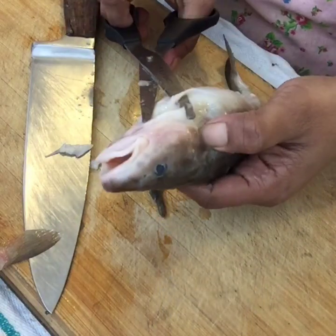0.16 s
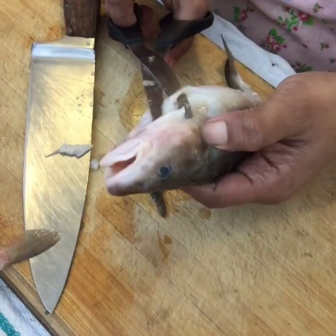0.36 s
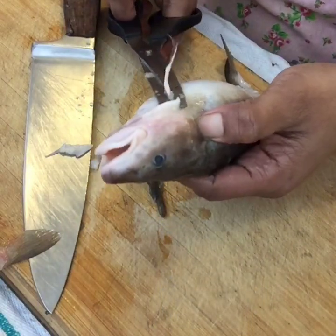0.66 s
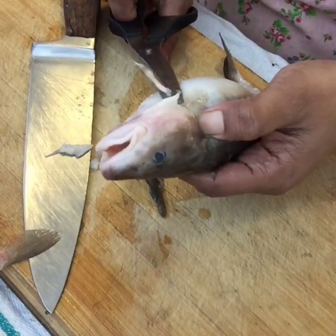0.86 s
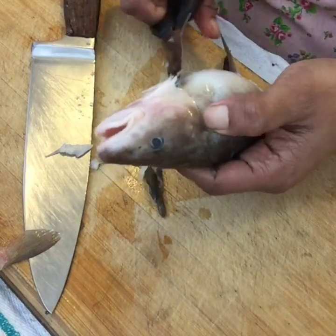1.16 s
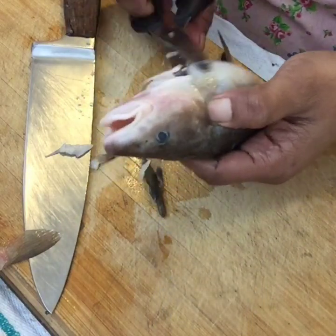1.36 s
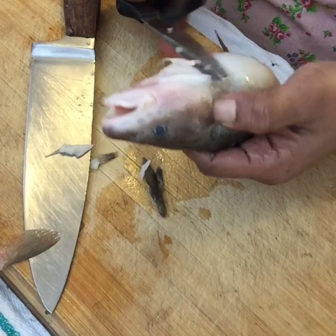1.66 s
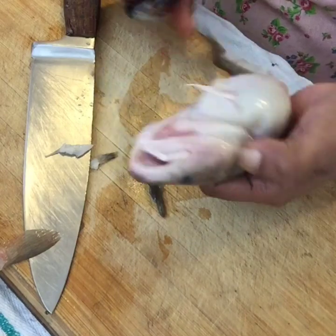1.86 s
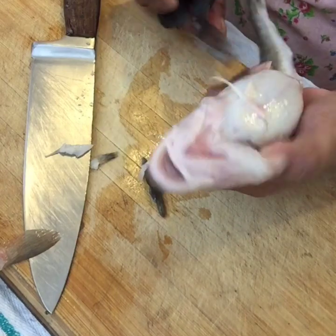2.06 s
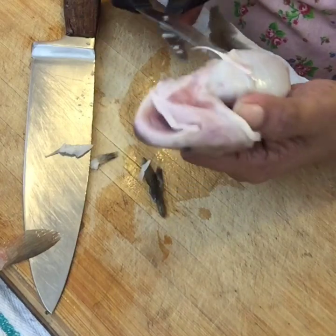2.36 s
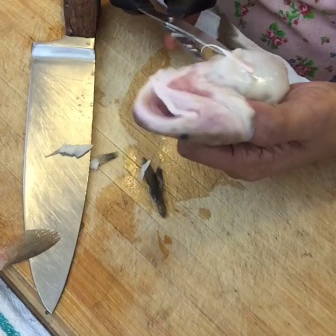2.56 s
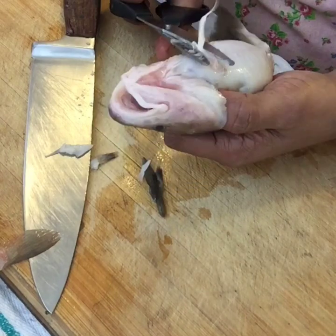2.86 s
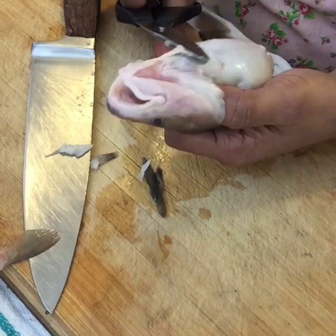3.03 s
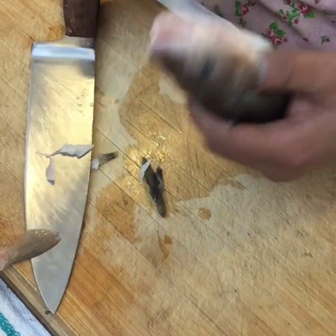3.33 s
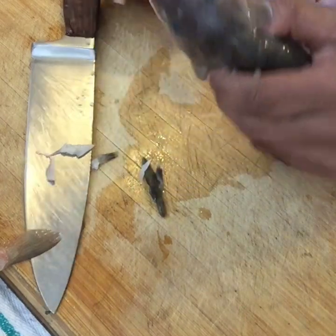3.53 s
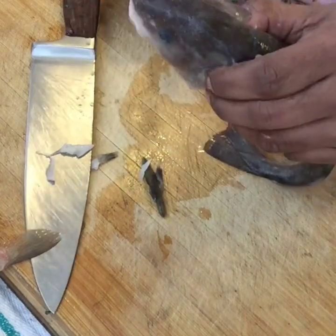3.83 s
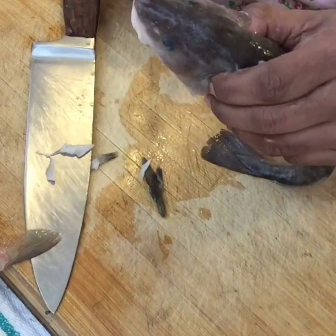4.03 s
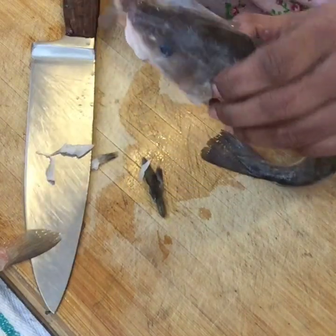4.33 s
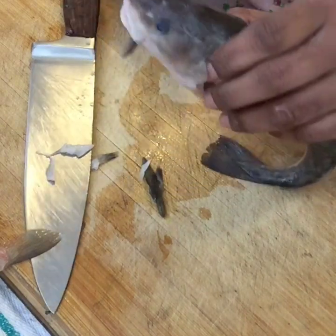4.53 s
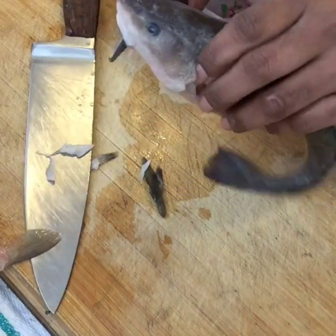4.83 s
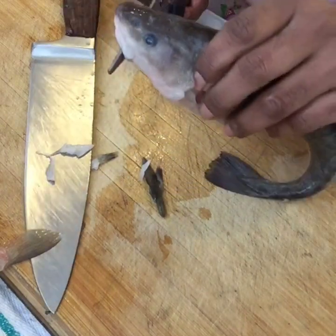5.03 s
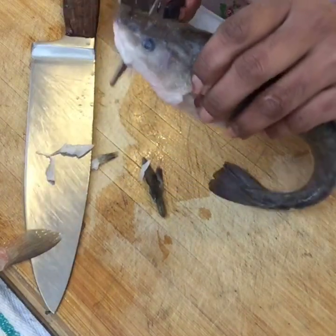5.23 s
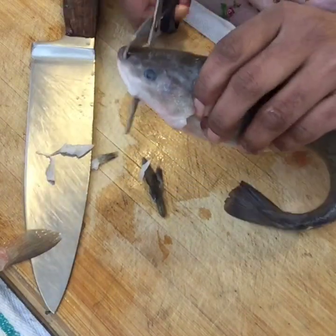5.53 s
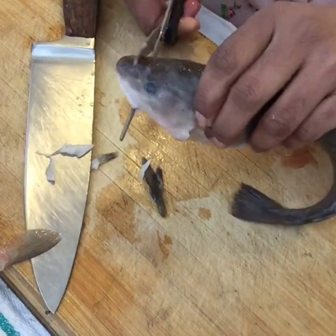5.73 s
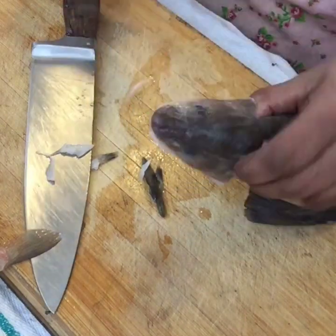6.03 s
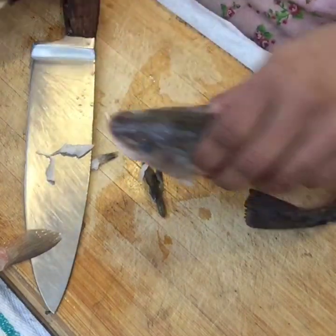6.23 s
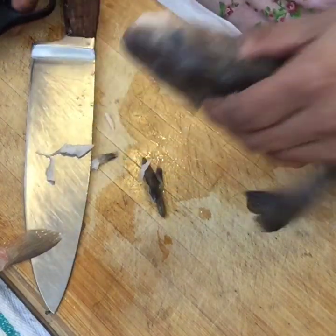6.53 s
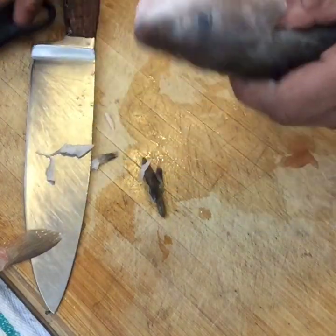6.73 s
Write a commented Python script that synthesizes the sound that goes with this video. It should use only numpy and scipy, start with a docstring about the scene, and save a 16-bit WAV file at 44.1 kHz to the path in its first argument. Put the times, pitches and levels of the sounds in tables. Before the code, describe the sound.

Small metallic scissor snips over faint room hum, then a solid knock on wood, a long near-silence, and two sharp closing clacks with bounces.

```python
"""In a small kitchen, scissors snip fins off a raw fish over a wooden board, and tools knock on the board.
Snips and knocks excite decaying sinusoidal modes of blades and board, with a noise crack at contact.
Short swells of filtered noise are soft rustles of wet fingers and blades, and one bright snip burst;
dense noise echoes are the room. Wavering sine tones are appliance hum, shaped noise is rumble and hiss,
and an earlier clink dies away."""
import sys
import numpy as np
from scipy import signal
from scipy.fft import rfft, irfft
from scipy.io import wavfile
from scipy.ndimage import uniform_filter1d

SR = 44100
rng = np.random.default_rng(int(sys.argv[2]) if len(sys.argv) > 2 else 0)


def digitize_waveform(pressure):
    """Quantize a signal to 16-bit integers and store it at the path in sys.argv[1].

    Rows of a 2-D input are taken as channels; values are limited to [-1, 1].
    """
    field = np.atleast_2d(pressure).T
    bounded = np.clip(field, -1, 1)
    quanta = np.round(bounded * 32767).astype(np.int16)
    wavfile.write(sys.argv[1], SR, quanta)


N = 303981

# appliance tones: f/Hz, rms wander/Hz, rms swell/dB, mean level curve [(t/s, level/dB)]
HUM_TONES = [(61.3, 0.37, 3, [(0, -76), (1.6, -63.5), (3, -60), (4.3, -61.5), (5.2, -70), (6.89, -72)]),
             (120.6, 0.71, 2.7, [(0, -72), (3.75, -71.5), (3.95, -61.5), (6.89, -61.5)]),
             (152, 1.5, 3, [(0, -64), (3, -69.5), (6.89, -62.5)]), (239.8, 2.5, 4, [(0, -85), (.27, -61),
             (1.15, -61.5), (1.5, -78.5), (2.1, -72), (2.5, -61.5), (2.95, -61), (3.6, -67.5), (4.45, -78),
             (4.7, -62), (5.1, -77), (5.7, -61.5), (6.89, -60.5)])]
# room rumble and microphone noise: f/Hz, relative spectral level/dB
HISS_SPECTRUM = [(15, -79), (25, -40.5), (36, -14), (49, -6), (68, -4.5), (87, -9.5), (131, -7.5),
                 (190, -16), (232, -6), (339, -22.5), (979, -27), (4000, -36.5), (6000, -38), (9000, -43.5),
                 (12000, -44.5), (15300, -48), (15900, -59), (16600, -72.5)]
# an earlier clink still dying away: low f/Hz, high f/Hz, starting level/dB
FADING_BANDS = [(1300, 1500, -74), (2100, 2370, -73.5), (4000, 4400, -76.5), (5270, 6100, -77.5)]
# blades biting fin rays, ticking and closing: t/s, level/dB, colour f/Hz, colour width/octaves,
# crack level over the ring/dB
SNIPS = [(.466, -61, 2250, .12, -30), (.4888, -54, 2220, 0.091, -30), (.6785, -59, 1960, 1.6, -1),
         (.7155, -59, 4200, .67, -1), (.7385, -51, 2230, 0.7, -1), (.7476, -54, 2240, 1.7, -7),
         (.7748, -51, 2250, 2.1, -8), (.8312, -65, 5000, .96, 1), (.8642, -62, 5400, 0.16, -2),
         (.9028, -44, 5800, 1.1, -8), (.9060, -25, 4300, 1.15, -16), (.9088, -27.5, 2460, 1.6, -5.5),
         (1.1670, -47.5, 2190, 0.13, -30), (1.1674, -55.5, 4200, 0.35, -30), (1.2500, -50, 2230, 0.13, -7),
         (1.7845, -42, 2920, 0.16, -32), (2.5718, -41, 2520, 0.4, -30), (3.0280, -49, 1652, .13, -5.5),
         (3.0315, -49, 6450, .28, 0.4), (3.0470, -42.5, 1598, 0.14, 2), (3.0502, -31, 1600, .12, -5.5),
         (3.0560, -36, 3402, .5, -7.4), (3.0810, -40.5, 2910, 0.29, -10.5), (3.0904, -50, 2590, .56, -7.5),
         (4.0892, -59, 3160, 0.34, -16.5), (5.5094, -59, 1900, 0.29, -27), (5.7035, -49, 2250, 0.6, -25)]
# blade modes: nominal f/Hz, relative level/dB, t60 before the ring length factor/s
BLADE_MODES = [(1640, -16.5, 0.027), (2031, -4, 0.038), (2210, 1, .04), (2450, -2.5, 0.018),
               (2680, -3, 0.031), (3161, -7.5, 0.017), (3323, -2.5, 0.019), (3856, -1.5, 0.068),
               (4370, -0.5, .025), (5407, 0, 0.042), (6250, -10.5, 0.046), (6457, 4.5, 0.029),
               (7090, -6, .02), (7756, 1, 0.01)]
# kitchen echo bands: centre f/Hz, relative level/dB, t60/s
ECHO_BANDS = [(153, -3, 0.4), (286, -7, .42), (601, -10, 0.32), (1200, -12, .4), (2400, -14, 0.34),
              (4827, -15, 0.32), (9610, -18, 0.22), (13880, -15.5, 0.13)]
# tools landing and bouncing: t/s, level/dB, colour f/Hz, colour width/octaves, ring length factor,
# crack level over the ring/dB, lingering mode level over the ring/dB
KNOCKS = [(0.907, -47.5, 553, 1.4, 0.69, -42, -45), (3.327, -29, 750, 1, 1.3, -30, -40),
          (3.3433, -10.5, 1260, 1.5, 0.68, -35, -28), (3.3462, -12.5, 950, 1.92, 0.61, -40, -29),
          (3.352, -15, 2844, 0.32, 0.86, -40, -37), (3.355, -21, 635, 4, 1.2, -35, -28.5),
          (3.368, -31, 410, 1.4, 1.3, -42, -20), (3.399, -41, 640, .26, 1.7, -38, -30),
          (5.70, -50.5, 294, 1.14, 1, -29, -36), (6.4521, -2.5, 4300, 0.79, 0.32, -14, -30),
          (6.4542, -8.5, 1510, 2.22, 0.78, -22, -25), (6.512, -23, 2557, 1.7, 0.53, -30, -23),
          (6.531, -23.5, 1770, 1.13, 0.64, -23, -30), (6.731, -37.5, 1500, 1.84, 0.51, -33, -43),
          (6.738, -30.5, 477, 1.23, 0.94, -33, -34.5), (6.854, -23.5, 670, 1.9, 0.75, -37.5, -28),
          (6.859, -8, 2220, 0.84, 0.36, -57, -15), (6.862, -23, 300, 3.7, 1.6, -45, -30),
          (6.8838, -19.5, 2120, 3, 0.37, -34, -3)]
# board modes: nominal f/Hz, relative level/dB, t60 before the ring length factor/s
BOARD_MODES = [(143, -8, 0.42), (220.3, -2.5, 0.21), (344, -4, 0.11), (410, -6.5, .12), (575, -1, 0.14),
               (642, -3, 0.1), (790, -12, 0.078), (891, -13.5, 0.024), (1040, -10.5, 0.12),
               (1134.3, -2, 0.04), (1260, -8.5, .07), (1310, -10.5, 0.035), (1670, 0, 0.044),
               (2126, -1.5, 0.029), (2178, -8.5, 0.11), (2290, -5, 0.019), (2426, -15.5, 0.044),
               (2567, -10.5, 0.031), (3257, -8.5, 0.073), (3400, -10, 0.019), (3770, -8.5, 0.064),
               (4110, -3, 0.014), (4810, -6.5, .04), (5380, -11, 0.066), (5875, -11.5, .03),
               (6730, -20.5, .04), (8390, -22.5, .03), (9500, -22.5, .03)]
# soft rustles of wet fingers and blades, and one short bright snip burst at 3.055 s:
# middle t/s, half-length to 1/e/s, level/dB, low f/Hz, high f/Hz
RUSTLES = [(1.42, 0.016, -70.5, 1500, 6500), (1.776, 0.022, -69, 5500, 6860),
           (1.788, 0.016, -66, 8900, 10700), (1.782, 0.03, -65.5, 2260, 3500),
           (2.204, 0.028, -75, 1500, 7000), (3.055, .007, -37, 5340, 15500),
           (4.66, 0.012, -74.5, 2510, 4000), (4.933, .02, -75.5, 5960, 16000),
           (5.208, .018, -76, 10840, 15240), (5.511, 0.041, -78.5, 8970, 16090)]
# dips of the microphone port: f/Hz, width/Hz, level/dB
PORT_DIPS = [(4950, 500, -4), (10400, 800, -5)]

HUM_SWELLS_PER_S = 11
TREBLE_HISS_DB = -68.5
FADING_T60_S = 2.1
SNIP_CRACK_HZ, KNOCK_CRACK_HZ = (9500, 15500), (2980, 10500)
SNIP_CONTACT_MS, KNOCK_CONTACT_MS = 1.6, 1.8
# what the walls receive
RING_TO_ROOM_DB, CRACK_TO_ROOM_DB, SCATTER_S = -10.5, 2, 0.00083
SNIP_ECHO_DB = -1.5
# a snip that touches few modes rings longer: length factor at one octave, power of the width
SNIP_RING, SNIP_RING_POWER = 0.45, -.3
# the mode that lingers after a blow: (f/Hz, ring length factor)
BLADE_LINGER, BOARD_LINGER = (2450, 4.5), (2170, 3.2)
LINGER_OCTAVES, LINGER_DELAY_S = .09, 0.0016
LINGER_FLUTTER_DB, LINGER_FLUTTER_MS = 4.5, 6
# harder snips wake it more: dB over the ring for the hardest, dB lost per dB of softer snip
BLADE_LINGER_DB, BLADE_LINGER_SLOPE = -17, .6
TOP_HZ = 16672


def undb(db):
    """Logarithmic level: decibels become an amplitude gain."""
    return 10 ** (np.asarray(db) / 20)


def unit(x):
    """Normalization of power: the signal is scaled to rms 1."""
    return x / np.sqrt(np.mean(x ** 2))


def band(x, low_hz, high_hz):
    """Band limitation by a Butterworth filter."""
    sos = signal.butter(N=2, Wn=[low_hz, high_hz], btype="band", fs=SR, output="sos")
    return signal.sosfilt(sos, x)


def walk(rate):
    """Random modulation: twice-averaged noise of rms 1 that turns about rate times a second."""
    k = int(SR / rate)
    return unit(uniform_filter1d(uniform_filter1d(rng.standard_normal(N), k), k))


def decay(t, t60):
    """Exponential damping: the amplitude falls 60 dB in t60."""
    return np.exp(-np.log(1000) * t / t60)


def hum():
    """Frequency and amplitude modulation: low appliance tones swell, fade and wander a few hertz."""
    out = 0
    for hz, wander_hz, swell_db, curve in HUM_TONES:
        phase = 2 * np.pi * np.cumsum(hz + wander_hz * walk(16)) / SR
        db = np.interp(np.arange(N) / SR, *np.transpose(curve))
        db = db + swell_db * walk(HUM_SWELLS_PER_S) + 4.4 * walk(25)
        out = out + np.sqrt(2) * undb(db) * np.sin(phase)
    return out


def hiss():
    """Spectral shaping of random noise: steady treble over a bass that swells a little."""
    hz, db = np.transpose(HISS_SPECTRUM)
    f = np.maximum(np.fft.rfftfreq(N, 1 / SR), 1)
    spectrum = rfft(rng.standard_normal(N)) * undb(np.interp(np.log(f), np.log(hz), db))
    treble = irfft(spectrum * (f >= 400), N)
    bass = irfft(spectrum * (f < 400), N)
    swell = undb(0.5 + 0.59 * walk(4.1))
    return undb(TREBLE_HISS_DB) / np.std(treble) * (treble + bass * swell)


def fading_clink():
    """Exponential decay: narrow noise bands left by an earlier clink sink into the hiss."""
    bands = 0
    for low_hz, high_hz, db in FADING_BANDS:
        bands = bands + undb(db) * unit(band(rng.standard_normal(N), low_hz, high_hz))
    return bands * decay(np.arange(N) / SR, FADING_T60_S)


def blows(events, modes, crack_hz, contact_ms, linger):
    """Modal excitation: each blow weights the body's modes by where it lands, and cracks during contact.
    Row 0 reaches the microphone, row 1 the walls."""
    out, t = np.zeros((2, N + SR)), np.arange(SR // 5) / SR
    hz, mode_db, t60 = np.array(modes, float).T[:, :, None]
    linger_hz, linger_length = linger
    contact = contact_ms / 1000
    rise = np.sin(np.pi / 2 * np.minimum(t / (0.35 * contact), 1)) ** 2
    free = np.maximum(t - 0.71 * contact, 0)  # time since damping began
    # the ring is a near sound; the walls get mostly the first instant
    far = undb(RING_TO_ROOM_DB) + np.exp(-free / SCATTER_S)
    paths = np.array([np.ones(len(t)), far])
    # from afar the crack is one clean click, its energy set by the contact time
    click = band(signal.unit_impulse(len(t), int(contact * SR)), *crack_hz)
    click = undb(CRACK_TO_ROOM_DB) * click * np.sqrt(contact * SR / np.sum(click ** 2))

    for s, level_db, colour_hz, octaves, length, crack_db, linger_db in events:
        phase, grit = rng.random((len(modes), 1)), rng.standard_normal(len(t))
        # every mode is detuned a little at random for each blow
        detune = 1 + .007 * rng.standard_normal((len(modes), 1))
        waves = np.sin(2 * np.pi * (hz * detune * t + phase))

        def ring(centre_hz, width, stretch):
            """Modal superposition: modes near one colour sound together, each with its own damping."""
            weight = undb(mode_db - 9.9 * (np.log2(hz / centre_hz) / width) ** 2)
            modal_sum = np.sum(weight * decay(free, t60 * stretch) * waves, axis=0)
            return modal_sum / np.sqrt(np.sum(weight ** 2))

        # slow random flutter roughens the lingering mode
        flutter = unit(uniform_filter1d(grit, int(LINGER_FLUTTER_MS * SR / 1000)))
        late_gain = undb(linger_db + LINGER_FLUTTER_DB * flutter) * (1 - np.exp(-t / LINGER_DELAY_S))
        late = late_gain * ring(linger_hz, LINGER_OCTAVES, linger_length)
        near_crack = unit(band(grit, *crack_hz)) * np.exp(-free / (.8 * contact))
        crack = undb(crack_db) * np.array([near_crack, click])
        ringing = (ring(colour_hz, octaves, length) + late) * paths
        i = int(s * SR)
        out[:, i:i + len(t)] += undb(level_db) * rise * (ringing + crack)
    return out[:, :N]


def scissors():
    """Modal excitation of steel: snips ring the blades, and harder ones wake the lingering mode more."""
    hardest_db = max(row[1] for row in SNIPS)
    events = []
    for s, db, hz, octaves, crack_db in SNIPS:
        length = SNIP_RING * octaves ** SNIP_RING_POWER
        linger_db = BLADE_LINGER_DB - BLADE_LINGER_SLOPE * (hardest_db - db)
        events.append((s, db, hz, octaves, length, crack_db, linger_db))
    return blows(events, BLADE_MODES, SNIP_CRACK_HZ, SNIP_CONTACT_MS, BLADE_LINGER)


def kitchen(x):
    """Reverberation: dense echoes build up over the first milliseconds; each band has its own decay."""
    t, response = np.arange(SR // 2) / SR, 0
    for hz, db, t60 in ECHO_BANDS:
        noise = band(rng.standard_normal(len(t)), hz / np.sqrt(2), hz * np.sqrt(2))
        response = response + undb(db) * noise * decay(t, t60) / np.sqrt(t60 * SR / 20)
    build_up = 1 - np.exp(-t / 0.0011)
    return signal.fftconvolve(x, response * build_up)[:N]


def board():
    """Modal excitation of wood: tools landing and bouncing ring the board."""
    return blows(KNOCKS, BOARD_MODES, KNOCK_CRACK_HZ, KNOCK_CONTACT_MS, BOARD_LINGER)


def rustles():
    """Band limitation of grainy noise: short swells make the soft rustles and one bright snip burst."""
    t, out = np.arange(N) / SR, 0
    grain = rng.standard_normal(N) * undb(2.2 * walk(300))
    for s, length, db, low_hz, high_hz in RUSTLES:
        swell = np.exp(-((t - s) / length) ** 2)
        out = out + undb(db) * unit(band(grain, low_hz, high_hz)) * swell
    return out


def scene():
    """Linear superposition: blows and rustles with their echo over the clink, hum and hiss."""
    background = hum() + hiss() + fading_clink()
    snips, knocks, swells = scissors(), board(), rustles()
    # hands and fish shade the snips and rustles from the walls
    echo = kitchen(knocks[1] + undb(SNIP_ECHO_DB) * (snips[1] + swells))
    return (snips[0] + knocks[0] + swells + echo + background)[None]


def record(dry):
    """Transducer response: the microphone port dips at two frequencies, peaks saturate, the top is cut."""
    for hz, width_hz, db in PORT_DIPS:
        dry = dry + (undb(db) - 1) * signal.lfilter(*signal.iirpeak(hz, hz / width_hz, fs=SR), dry)
    rounded = .9 * np.tanh(dry / .9)
    return signal.sosfilt(signal.ellip(12, .2, 70, TOP_HZ, fs=SR, output="sos"), rounded)


dry = scene()
out = record(dry)
digitize_waveform(out)
```